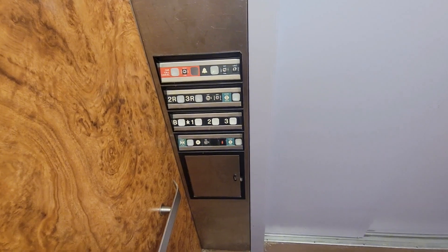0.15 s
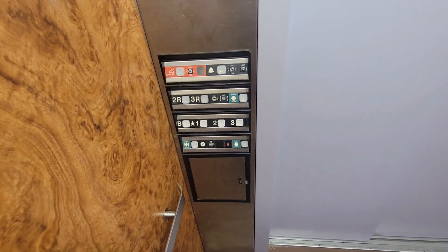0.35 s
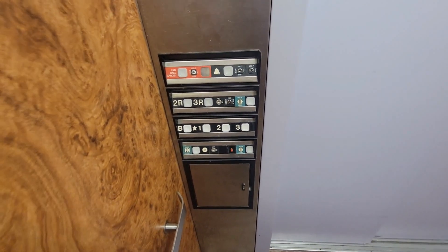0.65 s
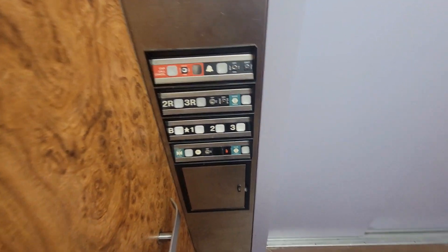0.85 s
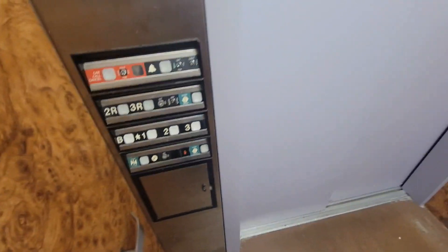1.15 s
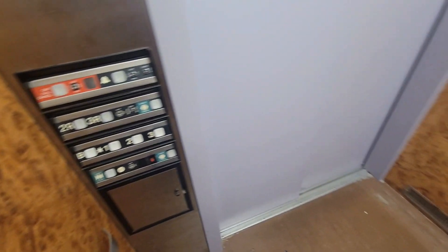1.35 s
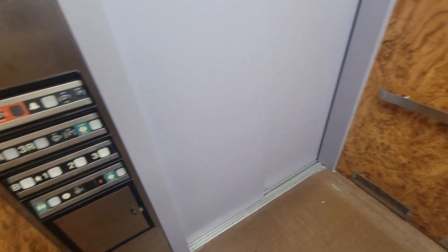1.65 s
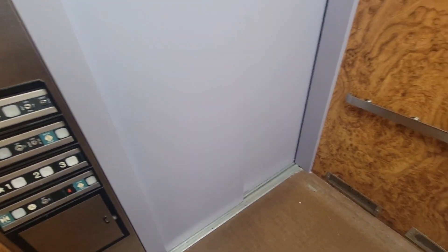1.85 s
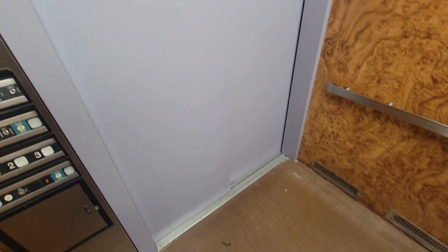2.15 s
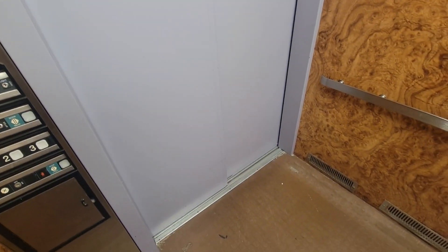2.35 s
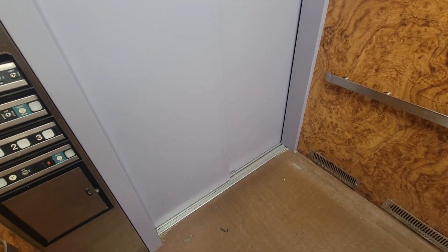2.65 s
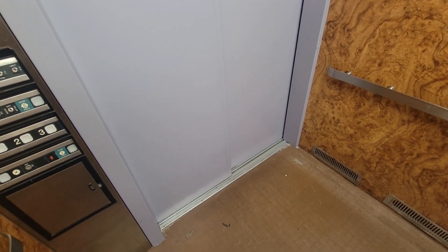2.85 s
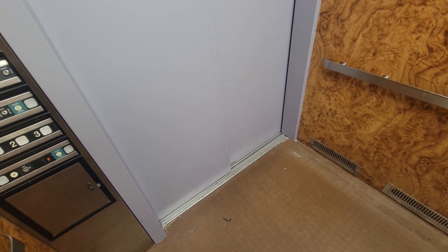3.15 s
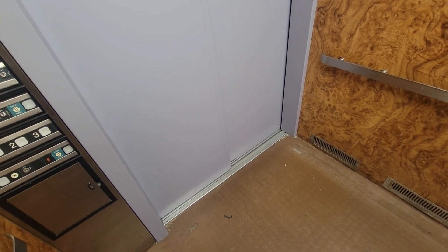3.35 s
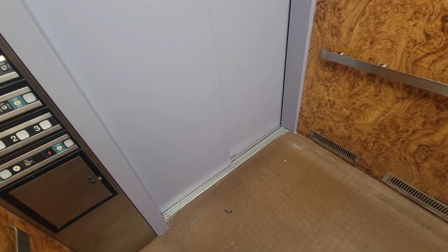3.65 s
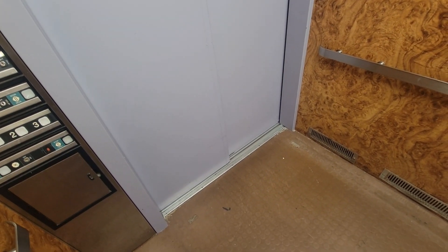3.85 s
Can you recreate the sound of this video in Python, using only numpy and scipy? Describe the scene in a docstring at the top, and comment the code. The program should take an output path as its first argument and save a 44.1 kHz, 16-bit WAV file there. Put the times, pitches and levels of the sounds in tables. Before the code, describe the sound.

An elevator car travels at steady speed for about four seconds, with a boomy low rumble, deep wavering hum and faint mid-pitched whines, heard inside the small cab. Soft low sways and shudders come near 0.75, 1.5 and 3.6 s. Faint ticks from 1.0 s precede one sharp, close click at 1.2 s with a brief echo. Clothing rustles softly; barely audible high squeaks occur near 0.9 and 2.7 s.

```python
"""A low hum and a rumble fill a small panelled hydraulic elevator cab at steady speed, with sways and bumps.
One sharp click sounds close by after a few faint ticks; clothing rustles and something squeaks faintly, twice.
Rumble, cab air modes, bumps and cloth are shaped noise; the pump and other machinery are wavering tones.
Sways are short low waves, clicks are contacts that ring and echo, and squeaks are grainy tones that bend.
"""
import sys
import numpy as np
from scipy import signal
from scipy.fft import rfft, irfft
from scipy.io import wavfile

SR = 44100
rng = np.random.default_rng(int(sys.argv[2]) if len(sys.argv) > 2 else 0)


def put_to_file(sound):
    """Save the sound as 16-bit audio at rate SR, in the file named by the first command-line argument."""
    columns = np.atleast_2d(sound).T  # one column per channel
    safe = np.clip(columns, -1, 1)
    whole_steps = np.round(safe * 32767)
    wavfile.write(sys.argv[1], SR, whole_steps.astype(np.int16))


N = 176400  # 4 s
T = np.arange(N) / SR


def from_db(db):
    """Turn decibels into a gain."""
    return 10 ** (np.asarray(db) / 20)


def rms_one(x):
    """Scale a sound to an average strength (rms) of 1."""
    return x / np.sqrt(np.mean(x ** 2) + 1e-20)


def at_hz(points, hz):
    """Read a table between its points, with frequency on a log axis."""
    f, value = np.transpose(points)
    return np.interp(np.log(hz), np.log(f), value)


def pan(db):
    """Left and right gains for a left-minus-right difference in dB."""
    return from_db(np.array([[.5], [-.5]]) * db)


def swell(s, length):
    """A smooth bell-shaped rise and fall around a moment."""
    return np.exp(-.5 * ((T - s) / length) ** 2)


def held(start, end, edge_s):
    """Fade in, hold and fade out."""
    return .5 * (np.tanh((T - start) / edge_s) - np.tanh((T - end) / edge_s))


def drift(rate):
    """Random wandering with spread 1; a higher rate in Hz makes it faster."""
    step = 40  # samples between the computed points
    r = np.exp(-2 * np.pi * rate * step / SR)
    noise = rng.standard_normal(N // step + 2002)
    slow = signal.lfilter([1], [1, -2 * r, r * r], noise)[2000:]  # drop the filter's start-up
    return np.interp(np.arange(N) / step, np.arange(len(slow)), rms_one(slow))


def cab_noise(gain_at):
    """Stereo noise of a given colour, rms 1: alike left and right in the bass, diffuse in the treble."""
    # left-right likeness of the cab's sound: (f/Hz, likeness from -1 to 1)
    likeness = [(60,0.97),(130,0.99),(290,0.87),(640,0.043),(1410,-0.17),(3100,0.093),(15000,-0.28)]
    # balance of the cab's sound: (f/Hz, left minus right/dB)
    balance = [(60,0.5),(200,-1.6),(400,-4),(700,-2),(1300,-3.5),(2400,-1.5),(4400,-8),(8000,-11.5),(15000,-2.5)]
    hz = np.maximum(np.arange(N // 2 + 1) * SR / N, 1)
    mid, side = rfft(rng.standard_normal((2, N)))
    alike = np.clip(at_hz(likeness, hz), -.999, .999)
    shared = np.sqrt(1 + alike) * mid
    opposite = np.sqrt(1 - alike) * side * [[1], [-1]]
    spectrum = (shared + opposite) * gain_at(hz) * pan(at_hz(balance, hz))
    return rms_one(irfft(spectrum, N))


def coloured(spectrum):
    """Cab noise whose colour follows a spectrum table."""
    return cab_noise(lambda hz: from_db(at_hz(spectrum, hz)))


def tone(hz, wander, waver_db):
    """A machine tone that wavers in pitch (as a fraction) and in level; rms about 1."""
    phase = 2 * np.pi * np.cumsum(hz * (1 + wander * drift(3.97))) / SR
    return np.sqrt(2) * np.sin(phase) * from_db(waver_db * drift(6.9))


def bursts(rows):
    """Short swells of noise around a pitch, for shudders and creaks."""
    out = 0
    for s, length, db, centre, octaves in rows:
        shape = swell(s, length)
        burst = shape * cab_noise(lambda hz: np.exp(-.5 * (np.log2(hz / centre) / octaves) ** 2))
        out = out + from_db(db) * rms_one(burst) * np.sqrt(np.mean(shape ** 2))
    return out


def cab_ripple(hz):
    """The cab's crowded higher modes make many small peaks and dips in the rumble."""
    ripple_db, spacing_hz, full_from_hz = 2, 10, 510
    size = 4096
    heights = np.interp(hz / spacing_hz, np.arange(size), rng.standard_normal(size))
    return from_db(ripple_db * heights * np.minimum(hz / full_from_hz, 1) ** 2)


def rumble(effort_db):
    """The ride's vibration makes a broad noise, strongest in the bass, with a fluttering level."""
    # colour of the rumble: (f/Hz, relative level per Hz/dB)
    spectrum = [(20,-20),(30,-3),(42,-7),(65,-0.5),(85,-4),(102,-8),(125,-5.5),(180,-5),(250,-9),(320,-8.5),(430,-11.5),(560,-12.5),(760,-18),(1100,-17.5),(1500,-20.5),(1950,-28),(2500,-29),(3150,-32.5),(4000,-43),(5500,-51.5),(7000,-72.5),(12000,-67),(16000,-62.5)]
    base_db, flutter_db = -42, 0.85
    noise = cab_noise(lambda hz: from_db(at_hz(spectrum, hz)) * cab_ripple(hz))
    # the rumble follows only half of the effort's dB
    return noise * from_db(base_db + 0.5 * effort_db + flutter_db * drift(6.4))


def air_modes(effort_db):
    """The ride shakes the air in the cab, which booms at its own pitches."""
    # air modes of the cab: (f/Hz, width/Hz, level before effort/dB)
    modes = [(79.8,7,-51.5),(118.2,7.4,-47),(153,4.5,-48),(165.9,7.3,-53.5),(202,9,-54),(254.5,5.9,-53.5),(533,2.8,-59.5),(548,7,-63),(674,7.1,-65),(1094,9.7,-67.5)]

    def colour(hz):
        """Add up the power of the resonance peaks."""
        power = 0
        for f, width, db in modes:
            power = power + from_db(db) ** 2 / width / (1 + ((hz - f) / width) ** 2) ** 2
        return np.sqrt(power)

    total = np.sqrt(sum(from_db(db) ** 2 for _, _, db in modes))
    return cab_noise(colour) * total * from_db(effort_db)


def ride():
    """The moving car's vibration drives both the rumble and the cab's air modes."""
    # strength of the ride's vibration: (t/s, level/dB)
    effort = [(0,0),(.5,1),(1.0,0),(1.35,1.5),(1.8,-1.5),(2.4,-1),(2.8,-1),(3.3,-1.5),(3.6,2.5),(4,-2)]
    effort_db = np.interp(T, *np.transpose(effort))
    return rumble(effort_db) + air_modes(effort_db)


def pump():
    """The pump sends a deep steady hum through the frame, as a tone that wavers slightly."""
    hum_hz, hum_db, waver_db, wander = 50.8, -41, 1.1, .012
    return from_db(hum_db) * tone(hum_hz, wander, waver_db) * pan(-1.0)


def whines():
    """Steadier, higher machinery tones grow strong and weak as the car travels."""
    # whines: (f/Hz, strong from t/s, strong until t/s, strong level/dB, other level/dB, left minus right/dB)
    rows = [(375.8,0.26,1.88,-51.5,-63.5,-1),(392.4,2.6,3.95,-55,-65,-1.5),(496.7,0.77,1.5,-57,-67,-2),(838,1.6,4.4,-65.5,-70.5,-4.5),(874,2.2,4.4,-71,-74,-1.5),(1489,2.7,5.2,-70,-81,3.5)]
    fade_s, waver_db, wander = 0.033, 1.5, .0015
    out = 0
    for hz, start, end, strong_db, weak_db, pan_db in rows:
        level_db = weak_db + (strong_db - weak_db) * held(start, end, fade_s)
        out = out + tone(hz, wander, waver_db) * from_db(level_db) * pan(pan_db)
    return out


def sways():
    """The car sways on its plunger, as very low waves that rise and die away."""
    # sways: (t/s, length/s, peak level/dB)
    rows = [(0.749,0.041,-30),(1.643,0.04,-34),(2.268,0.042,-40.5)]
    sway_hz = 29.2
    out = 0
    for s, length, db in rows:
        out = out + from_db(db) * swell(s, length) * np.cos(2 * np.pi * sway_hz * (T - s))
    return out


def shudders():
    """The car shudders along its rails, as short bursts of low noise."""
    # shudders: (t/s, length/s, level/dB, centre f/Hz, width/octaves)
    rows = [(0.115,0.018,-35.5,188,0.52),(0.736,0.039,-39.5,85,0.52),(1.315,0.033,-41.5,227,0.67),(1.498,0.015,-31,158,0.078),(2.1,0.052,-39,115.8,0.09),(2.824,0.078,-42,157,0.16),(3.525,0.015,-38.5,103.5,0.34),(3.598,0.013,-34.5,79,0.3),(3.592,0.013,-32.5,193,0.13),(3.62,0.012,-39.5,262,0.12),(3.585,0.023,-43,430,0.56)]
    return bursts(rows)


def contacts(size):
    """Each contact is a short push, followed at once by a weaker rebound."""
    # contacts: (t/s, level/dB, low-pass f/Hz: lower is softer)
    rows = [(0.9908,-8,1700),(1.1899,0,16300)]
    rebound_s, rebound_db = 0.00065, -16.5
    force = np.zeros(N)
    n = np.arange(size)
    for s, db, soft_hz in rows:
        r = np.exp(-2 * np.pi * soft_hz / SR)
        push = (1 - r) ** 2 * (1 + n) * r ** n
        for delay, loss_db in ((0, 0), (rebound_s, rebound_db)):
            start = int((s + delay) * SR)
            force[start:start + size] += from_db(db + loss_db) * push
    return force


def click_ring(size):
    """A struck object rings at several pitches that die away quickly."""
    # ringing modes: (f/Hz, left level/dB, right level/dB, time to fall by 60 dB/s)
    modes = [(497,-23,-29.5,0.013),(880,-31,-27.5,0.017),(1620,-14,-21,0.0085),(3220,-20,-21.5,0.0041),(4460,-35.5,-27.5,.01),(4900,-23.5,-31.5,0.013),(5420,-42.5,-15,0.01),(6210,-30.5,-20.5,0.01),(7810,-34,-22.5,.006),(11400,-20,-18,0.0062),(12560,-32,-15,.006),(15000,-25.5,-25.5,.004)]
    left_lag_s = 0.00011
    t = np.maximum(T[:size] - np.array([[left_lag_s], [0]]), 0)
    ring = 0
    for k, (hz, left, right, t60) in enumerate(modes):
        wave = np.sin(2 * np.pi * hz * t) * np.exp(-np.log(1000) * t / t60)
        ring = ring + from_db([[left], [right]]) * wave * (-1) ** k  # every other mode is flipped
    return ring


def cab_echo(ring):
    """The cab returns a click as fading noise, with the treble dying sooner than the bass."""
    # colour of the echo: (f/Hz, relative level per Hz/dB)
    spectrum = [(200,5),(450,3.5),(1500,3),(3000,0.5),(5500,3.5),(8500,-4.5),(12000,3),(16000,-6.5)]
    echo_db, t60_s, treble_t60_s, treble_hz = -14.5, 0.31, 0.17, 4500
    echo = coloured(spectrum)
    body = signal.lfilter(*signal.butter(1, treble_hz, fs=SR), echo)
    treble = echo - body
    tail = body * np.exp(-np.log(1000) * T / t60_s) + treble * np.exp(-np.log(1000) * T / treble_t60_s)
    # set the echo's energy relative to the ring's
    return tail * from_db(echo_db) * np.sqrt(np.sum(ring ** 2) / np.sum(tail ** 2))


def clicks():
    """Little contacts set off a brief ring, which is heard directly and as the cab's echo."""
    size = SR // 50  # 20 ms
    force = contacts(size)
    ring = click_ring(size)
    direct = signal.fftconvolve(force[None], ring, axes=1)[:, :N]
    echo = signal.fftconvolve(force[None], cab_echo(ring), axes=1)[:, :N]
    return direct + echo


def creaks():
    """The panelling gives tiny creaks and ticks, as very short bursts of noise."""
    # creaks: (t/s, length/s, level/dB, centre f/Hz, width/octaves)
    rows = [(.9914,0.00063,-36,1900,0.65),(.9915,0.0006,-49,4100,0.3),(.994,0.0013,-39,1610,0.33),(1.0843,0.00081,-43,2460,0.23),(1.1023,0.0005,-56.5,4700,0.27),(1.388,0.0012,-55.5,4280,0.41)]
    return bursts(rows)


def rustle(strokes, spectrum, rough_db):
    """Sliding cloth makes noise in soft, slightly uneven strokes."""
    level = sum(from_db(db) * swell(s, length) ** 2 for s, length, db in strokes)
    return coloured(spectrum) * level * from_db(rough_db * drift(40))


def clothing():
    """Cloth slides with crisp swishes and duller rubs."""
    # crisp swishes: (t/s, length/s, level/dB)
    swishes = [(.05,0.094,-62.5),(.22,.07,-73),(1.0,0.25,-76.5),(1.385,0.05,-63.5),(1.49,0.088,-63.5),(1.63,.1,-70.5),(2.82,0.068,-86),(3.62,.1,-76.5)]
    # colour of the swishes: (f/Hz, relative level per Hz/dB)
    swish_colour = [(1500,-15.5),(3000,4),(4700,0.5),(6700,-1.5),(7700,-24),(9000,-6),(12000,2.5),(15500,-1.5)]
    # duller rubs: (t/s, length/s, level/dB)
    rubs = [(.27,0.18,-57.5),(.95,0.26,-60.5),(3.53,0.026,-59),(3.6,0.068,-55),(3.75,0.14,-64.5)]
    # colour of the rubs: (f/Hz, relative level per Hz/dB)
    rub_colour = [(300,-1),(600,8.5),(1500,2.5),(3000,-1),(5500,-10),(7500,-37.5),(15000,-27.5)]
    return rustle(swishes, swish_colour, rough_db=1.5) + rustle(rubs, rub_colour, rough_db=0.8)


def squeaks():
    """Light friction sings in thin, grainy tones whose pitch bends in an arc."""
    # squeaks: (t/s, length/s, start f/Hz, middle f/Hz, end f/Hz, level/dB)
    rows = [(.84,0.052,9400,9750,9800,-93),(0.91,0.067,10400,11450,11900,-86),(0.969,0.13,12100,12550,11950,-83),(0.973,0.089,8900,9600,9200,-84.5),(2.46,0.18,9150,9300,9660,-100),(2.682,.11,9660,10000,10850,-94),(2.778,.028,11500,12100,11400,-88),(2.775,0.088,9650,9450,9350,-88.5),(2.805,0.073,10450,10330,10250,-91)]
    grain_hz, wander, edge_s, pan_db = 120, 0.0044, .008, -11
    out = 0
    for s, length, start_hz, middle_hz, end_hz, db in rows:
        along = np.clip((T - s) / length, 0, 1)
        arc = (middle_hz - .5 * (start_hz + end_hz)) * np.sin(np.pi * along)
        glide = start_hz + (end_hz - start_hz) * along + arc
        hz = glide * (1 + wander * drift(30))
        phase = 2 * np.pi * np.cumsum(hz) / SR
        # two fast random drifts roughen the tone
        grainy = drift(grain_hz) * np.sin(phase) + drift(grain_hz) * np.cos(phase)
        out = out + from_db(db) * grainy * held(s, s + length, edge_s)
    return out * pan(pan_db)


def scene():
    """Everything heard in the cab, added together."""
    machinery = ride() + pump() + whines()
    bumps = sways() + shudders()
    small_sounds = clicks() + creaks() + clothing() + squeaks()
    return machinery + bumps + small_sounds


def record(dry):
    """The microphone loses the deepest bass and the top is cut."""
    bass_cut_hz, top_cut_hz = 15, 16000
    x = signal.sosfilt(signal.butter(2, bass_cut_hz, "high", fs=SR, output="sos"), dry)
    return signal.sosfilt(signal.ellip(10, .2, 80, top_cut_hz, fs=SR, output="sos"), x)


dry = scene()
out = record(dry)
put_to_file(out)
```